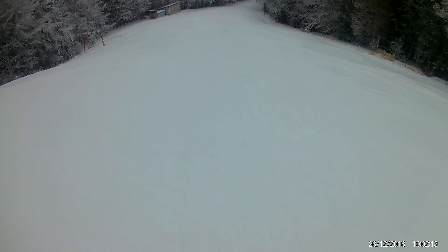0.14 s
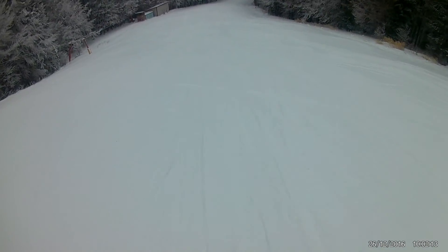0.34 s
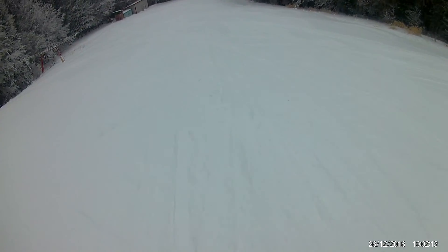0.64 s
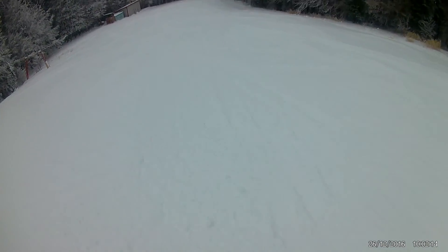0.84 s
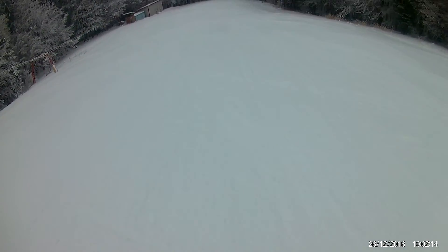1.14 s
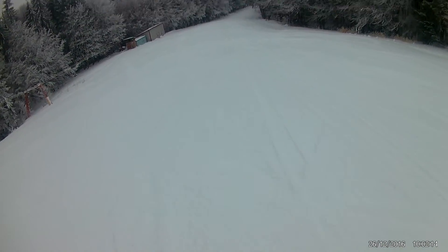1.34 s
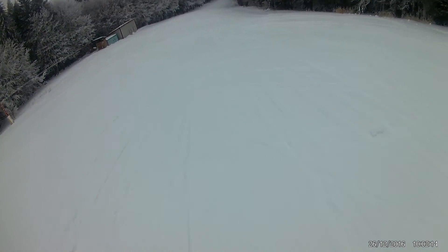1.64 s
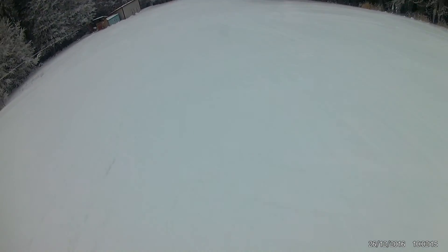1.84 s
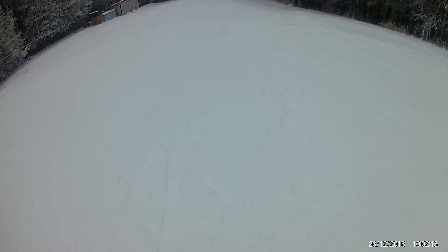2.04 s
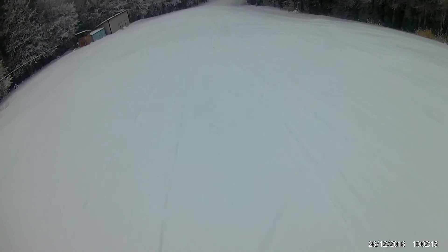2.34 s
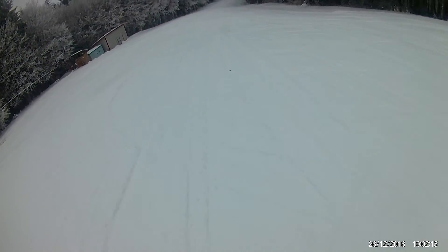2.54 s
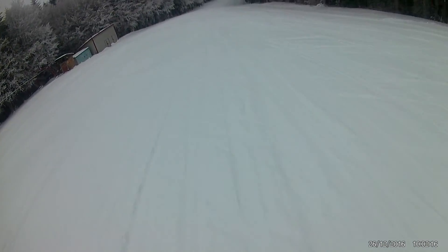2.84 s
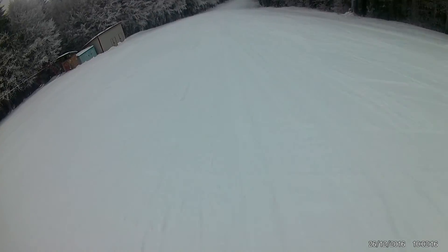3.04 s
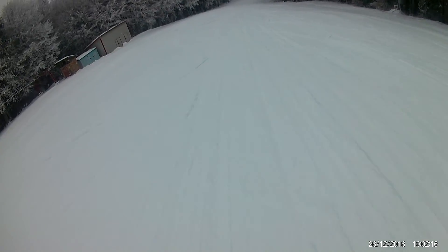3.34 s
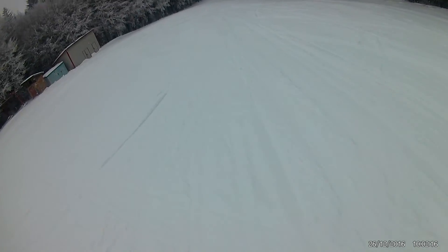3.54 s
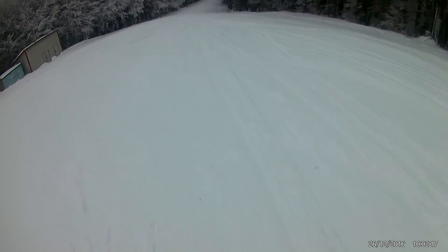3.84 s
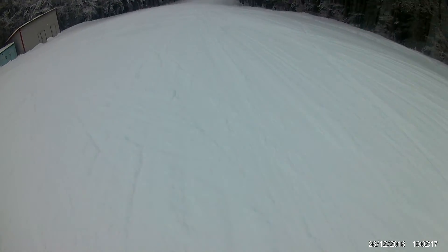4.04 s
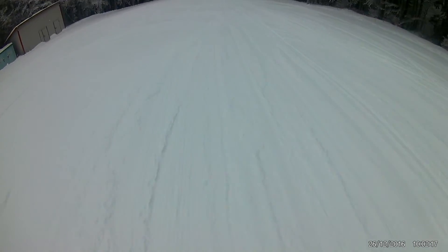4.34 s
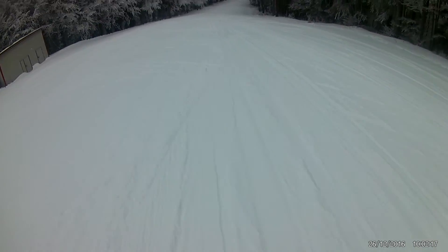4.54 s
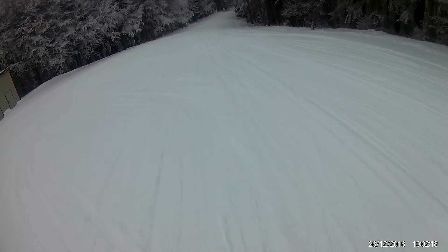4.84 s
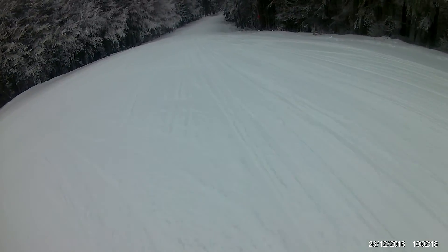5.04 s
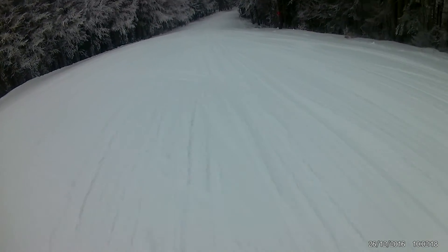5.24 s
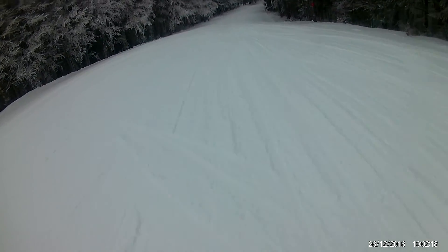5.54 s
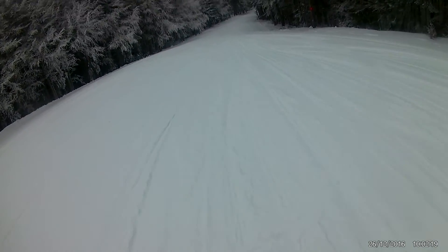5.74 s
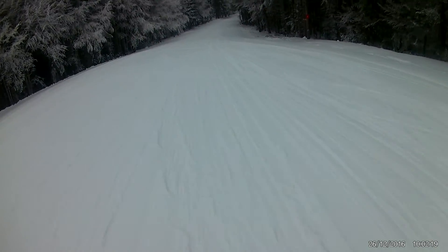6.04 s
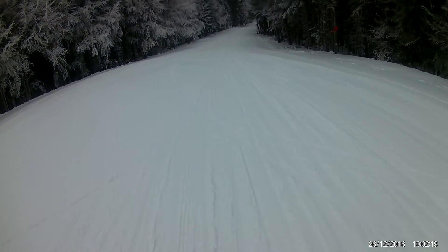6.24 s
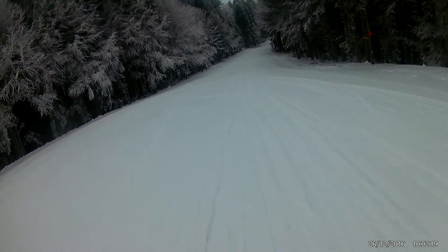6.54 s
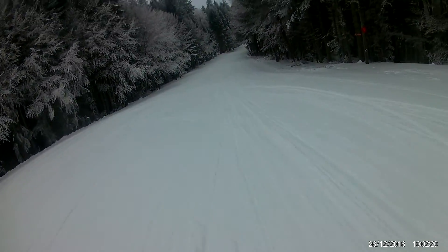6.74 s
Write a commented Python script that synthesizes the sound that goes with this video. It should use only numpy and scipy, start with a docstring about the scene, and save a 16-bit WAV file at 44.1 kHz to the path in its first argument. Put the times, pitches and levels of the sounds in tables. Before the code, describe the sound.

Skis scrape and hiss over packed snow with a low fluttering drone, while a loose plastic camera mount clacks sharply a few times.

```python
"""Packed snow scrapes and crackles under gliding skis: dense random grains of fracture, filtered to a spectrum.
A body-worn camera in a closed plastic case hears it, while its loose mount chafes: filtered stick-slip clicks.
Ski vibration drones as resonant noise whose pitch rises with load; wind rumbles as slowly modulated low noise.
Ice crumbs tick as decaying noise bursts, the mount clacks as struck resonances over bumps,
and patches of icy crust break in coarser grains."""
import sys
import numpy as np
from scipy import signal
from scipy.fft import rfft, irfft
from scipy.io import wavfile
from scipy.ndimage import uniform_filter1d, map_coordinates

SR = 44100
rng = np.random.default_rng(int(sys.argv[2]) if len(sys.argv) > 2 else 0)


def wav_out(sig):
    """Save sig, one row per channel (or a flat mono array), as 16-bit PCM at SR to the path in sys.argv[1]."""
    wavfile.write(sys.argv[1], SR, np.round(np.clip(np.atleast_2d(sig).T, -1, 1) * 32767).astype(np.int16))


N = 304290
T = np.arange(N) / SR  # time [s]


def undb(db):
    """Logarithmic level: decibels become an amplitude gain."""
    return 10 ** (np.asarray(db) / 20)


def unit(x):
    """Normalisation: scale to rms 1."""
    return x / np.sqrt(np.mean(x ** 2))


def response(points, size=8192):
    """Minimum phase: the causal impulse response, at peak 1, of a spectrum (frequency [Hz], level [dB])."""
    hz, db = np.transpose(points)
    octave = np.log2(np.maximum(np.arange(size // 2 + 1) * SR / size, 1))
    # above the last point the spectrum falls by 48 dB per octave, at most 60 dB
    rolloff_db = np.clip(48 * (octave - np.log2(hz[-1])), 0, 60)
    gain_db = np.interp(octave, np.log2(hz), db) - rolloff_db
    # folding the cepstrum onto positive time makes the response causal
    cepstrum = irfft(np.log(undb(gain_db)))
    cepstrum[1:size // 2] *= 2
    cepstrum[size // 2 + 1:] = 0
    h = irfft(np.exp(rfft(cepstrum)))[:size // 2]
    return h / np.abs(h).max()


def ring(x, h):
    """Convolution: every sample of x excites the impulse response h."""
    return signal.fftconvolve(x, h)[:N]


def colour(x, points):
    """Linear filtering: shape x by a spectrum, at rms 1."""
    return unit(ring(x, response(points)))


def walk(rate):
    """Random modulation: straight lines between random values, rate per second, with spread near 1."""
    return 1.2 * np.interp(T * rate, np.arange(4096), rng.standard_normal(4096))


def grains(rate, spread_db):
    """Shot noise: random clicks, rate per second, mostly small with a few large ones, at rms 1."""
    size = undb(spread_db * np.minimum(rng.exponential(size=N), 4.8))
    present = rng.random(N) < rate / SR
    return unit(present * size * rng.choice([-1, 1], N))


def blows(times, db):
    """Impulsive excitation: one single-sample impulse for each blow."""
    out = np.zeros(N)
    index = np.clip(np.round(times * SR).astype(int), 0, N - 1)
    np.add.at(out, index, undb(db))
    return out


def add(out, s, sound):
    """Superposition: mix a short sound into out at time s."""
    part = out[max(round(s * SR), 0):][:len(sound)]
    part += sound[:len(part)]


def along(table):
    """Linear interpolation: the columns of a curve table at every sample."""
    s, *columns = np.transpose(table)
    return [np.interp(T, s, c) for c in columns]


def swells(table):
    """Gaussian envelopes: bumps of gain, each as long as two standard deviations."""
    return sum(undb(db) * np.exp(-2 * ((T - s) / length) ** 2) for s, length, db in table)


# spectrum of the scrape under the bases: (frequency [Hz], level [dB])
SNOW_SPECTRUM = [(200, 15.5), (330, 13), (450, 9.5), (750, 7), (1050, 5.5), (1370, 15), (1900, 5.5),
                 (2400, -2.5), (2750, -7.5), (3200, -1.5), (4250, -5.5), (5100, -19), (6000, -12.5),
                 (7400, -33)]
# spectrum of fine spray, also heard in crumbs and crust: (frequency [Hz], level [dB])
SPRAY_SPECTRUM = [(3000, -20), (4300, 15.5), (6100, 10.5), (7400, 5), (7950, -14.5), (8600, 0.5),
                  (9200, -3.5), (10700, -0.5), (12000, -20), (16000, -15.5)]
SPRAY_DB, SPRAY_PER_BITE = -72, 1.4  # level at the usual bite; dB gained per dB of bite


def snow(bite_db, scrape_db=-42.0, rough_db=0.77, patchy_db=5.0):
    """Granular fracture: countless crystals break under the bases; sparser ones crumble off the edges in bursts."""
    texture = walk(45)
    scrape = colour(grains(rate=9000, spread_db=2.0), SNOW_SPECTRUM)
    scrape = scrape * undb(scrape_db + bite_db + rough_db * texture)
    crumble = np.exp(-T[:1024] / .0009)  # decay constant 0.9 ms
    bursts = ring(np.abs(grains(rate=420, spread_db=3.5)), crumble) * rng.standard_normal(N)
    spray_db = SPRAY_DB + SPRAY_PER_BITE * bite_db + patchy_db * texture
    return scrape + colour(bursts, SPRAY_SPECTRUM) * undb(spray_db)


# spectrum of the mount, also heard as its rattle: (frequency [Hz], level [dB])
MOUNT_SPECTRUM = [(900, -24), (1150, -13.5), (1380, 4.5), (1900, 6.5), (2100, -4.5), (2380, 0.5),
                  (2700, -38.5), (4100, -13.5), (4600, -16.5), (5200, -58.5)]
# short rubs of the mount: (time at the middle [s], length [s], level [dB])
MOUNT_RUBS = [(0.32, .03, -47), (0.383, .025, -43), (0.686, .012, -40.5), (0.908, 0.034, -40.5),
              (1.067, 0.012, -35.5), (1.68, 0.24, -47), (2.524, 0.029, -37), (4.229, 0.029, -40.5),
              (4.62, 0.11, -41), (4.897, 0.033, -42.5), (5.068, .023, -40.5), (5.43, 0.13, -42),
              (6.378, 0.038, -36), (6.774, 0.011, -39.5)]
# stiff, higher ring of a rubbed joint: (frequency [Hz], level [dB])
JOINT_SPECTRUM = [(1500, -25.5), (1850, -1), (2000, 1.5), (2300, -5), (2600, -29)]
# squeaky resonance of the mount: (frequency [Hz], level [dB])
SQUEAK_SPECTRUM = [(4400, -30), (4740, -14.5), (4870, -3.5), (4990, -9), (5250, -37)]
JOINT_DB, SQUEAK_DB = -9.5, -23.5  # re the level of a rub
CHAFE_DB, CHAFE_PER_BITE = -51, 0.51  # level at the usual bite; dB gained per dB of bite
CHAFE_FLICKER_DB = 2.2


def chafing(bite_db):
    """Stick-slip friction: the joint slips in tiny clicks, more as the skis bite; at times it rubs and squeaks."""
    db = CHAFE_DB + CHAFE_PER_BITE * bite_db + CHAFE_FLICKER_DB * walk(28)
    light = colour(grains(rate=650, spread_db=3.5), MOUNT_SPECTRUM) * undb(db)
    slips = grains(rate=2200, spread_db=2.4)
    joint = undb(JOINT_DB) * colour(grains(rate=1300, spread_db=4.0), JOINT_SPECTRUM)
    squeak = undb(SQUEAK_DB) * colour(slips, SQUEAK_SPECTRUM)
    return light + swells(MOUNT_RUBS) * (colour(slips, MOUNT_SPECTRUM) + joint + squeak)


# how strongly the skis shake: (time [s], level [dB])
SHAKE_CURVE = [(0, -42), (1.05, -42), (1.55, -31.5), (2.08, -38.5), (2.38, -31), (2.92, -39), (3.2, -34.5),
               (4.01, -35.5), (4.08, -50.5), (4.3, -44.5), (4.57, -34), (5.08, -32.5), (5.18, -36),
               (5.82, -30.5), (6.02, -36.5), (6.14, -48), (6.53, -30.5), (6.9, -32.5)]
# resonance of the drone before its pitch shifts: (frequency [Hz], level [dB])
DRONE_SPECTRUM = [(70, -34.5), (115, -24), (136, -10.5), (154, 1.5), (175, 5), (186, -0.5), (205, -10.5),
                  (245, -22), (400, -51.5)]
DRONE_HZ = 172  # nominal pitch of that spectrum
SHAKE_REF_DB, LOADED_HZ, RISE_HZ_PER_DB = -34, 173.54, 1.5  # pitch at the reference shake, and its rise
SURGE_DB, SURGES_PER_S = 3, 17  # uneven snow makes the shaking come and go


def drone():
    """Forced resonance: the groomed surface shakes the skis; a low mode, rising with load, carries it to the case."""
    db, = along(SHAKE_CURVE)
    hz = LOADED_HZ + RISE_HZ_PER_DB * (db - SHAKE_REF_DB)
    hum = colour(rng.standard_normal(N), DRONE_SPECTRUM)
    # reading the hum faster or slower shifts its pitch
    hum = map_coordinates(hum, [np.cumsum(hz / DRONE_HZ)], order=3, mode="mirror")
    # constant load on the skis keeps the shaking from dying away for long
    power = uniform_filter1d(uniform_filter1d(hum ** 2, size=2200), size=2200) + 1e-6
    steady = unit(hum / np.sqrt(power))
    return steady * undb(db + SURGE_DB * walk(SURGES_PER_S))


# spectrum of the rumble in the case: (frequency [Hz], level [dB])
WIND_SPECTRUM = [(10, -33), (25, 1), (42, 3), (60, 12.5), (85, 7), (120, 9), (220, -7), (500, -61.5)]
# gusts on the case: (time at the middle [s], length [s], level [dB])
WIND_GUSTS = [(1.67, 0.043, -37.5), (1.8, 0.03, -39), (4.1, 0.042, -46), (6.15, 0.27, -48)]
WIND_DB, EDDY_DB, EDDIES_PER_S = -47, 2, 7.9  # steady headwind and its flutter


def wind():
    """Turbulent pressure: eddies of air buffet the closed case with a dull rumble that swells in gusts."""
    rumble = colour(rng.standard_normal(N), WIND_SPECTRUM)
    headwind = undb(WIND_DB + EDDY_DB * walk(EDDIES_PER_S))
    return rumble * (headwind + swells(WIND_GUSTS))


# larger ice crumbs on the shell: (time [s], strike strength [dB], bright top re strike [dB])
CRUMB_TICKS = [(0.1203, -42.5, -13), (1.1357, -44, -17), (1.6164, -36, -36), (1.681, -37.5, -22),
               (2.2281, -38, -23), (2.4035, -37.5, -13), (4.62, -43, -15), (5.4926, -41, -13),
               (5.5587, -52.5, -3), (5.8933, -42, -19)]
# spectrum of the snapping shell, also heard in crust: (frequency [Hz], level [dB])
SNAP_SPECTRUM = [(1800, -21), (2700, -5), (3250, 1.5), (3850, -7), (4250, 3.5), (4800, -3), (5300, -9.5),
                 (6000, -5), (7000, -45.5)]


def crumbs(crumble_s=0.0015, shell_db=-9.0):
    """Brittle impact: bits of ice burst on the shell with a thin, bright tick."""
    s, db, top_db = np.transpose(CRUMB_TICKS)
    burst = np.exp(-T[:1024] / crumble_s)
    shell = ring(blows(s, db + shell_db), burst) * rng.standard_normal(N)
    shards = ring(blows(s, db + top_db), burst) * rng.standard_normal(N)
    return ring(shell, response(SNAP_SPECTRUM)) + ring(shards, response(SPRAY_SPECTRUM))


# clacks of the mount: (time [s], clack peak [dB], clack pitch [Hz], thud pitch [Hz],
# thud re clack [dB], drive of the snap re clack [dB])
MOUNT_KNOCKS = [(0.302, -31, 1840, 510, -7, -17), (0.816, -29.5, 1380, 1060, -12, -13),
                (0.9764, 1, 1610, 920, -27, -19.5), (0.9837, -8, 1670, 1050, -20, -20),
                (0.995, -21, 1690, 982, -19, -21), (1.06, -28, 1730, 510, -14, -22),
                (1.274, -11.5, 1535, 890, -18.5, -19.5), (1.3181, -21.5, 1500, 571, -19, -21),
                (1.4819, -28.5, 1480, 587, -15, -21), (1.617, -25, 1530, 807, -22, -16),
                (1.6473, -23, 1530, 616, -21, -21), (1.6817, -30, 1400, 650, -12, -14),
                (1.798, -24, 1460, 506, -14, -19), (2.433, -28.5, 1340, 587, -13, -20),
                (3.4064, -27.5, 1680, 611, -10, -5), (3.4342, -24, 1370, 730, -13, -17),
                (3.469, -26, 1420, 813, -18, -10), (3.4917, -23, 1580, 834, -11, -22),
                (3.5016, -15, 1560, 526, -8, -11), (3.504, -18, 1290, 800, -6.5, -18),
                (3.8667, -29.5, 1690, 506, -13, -20), (4.116, -33, 1440, 1060, -21, -15),
                (4.3032, -28.5, 1500, 946, -13, -12), (4.4447, -27, 1410, 668, -16, -26),
                (4.8936, -29, 1880, 522, -26, -13), (5.4797, -27.5, 1480, 900, -12, -20),
                (6.6093, -25, 1360, 850, -12, -14.5), (6.6503, -6, 1653, 913, -20, -15),
                (6.7003, -25.5, 1360, 765, -1, -23), (6.765, -21.5, 1570, 895, -8, -16),
                (6.794, -34, 1330, 900, 1, -17)]
# spectrum of a clack before it moves to its own pitch: (frequency [Hz], level [dB])
CLACK_SPECTRUM = [(200, -31.5), (480, -15), (700, -24.5), (1100, -34.5), (1320, -2.5), (1460, -2.5),
                  (1620, 3.5), (1790, -2.5), (2000, -19.5), (2300, -14.5), (2650, -33), (4000, -74)]
CLACK_HZ = 1600  # nominal pitch of that spectrum
# upper modes of the case: (frequency [Hz], level [dB], time to decay by 60 dB [s])
CASE_MODES = [(2286, 2.5, 0.018), (2930, -3, 0.013), (3276, -6, 0.021), (4177, -1.5, 0.017),
              (4825, -12.5, 0.028), (6000, -28, .008)]


def knocks(thud_s=0.0012, contact_s=0.00076, rattle_db=-25, rattle_s=0.0052):
    """Modal impact: the mount hits its stop with a dry hollow clack, a thud, a snap of case modes and a rattle."""
    out, t = np.zeros(N), T[:2048]
    snap = np.zeros(len(t))
    for hz, db, t60 in CASE_MODES:
        decay = np.exp(-np.log(1000) * t / t60)
        snap += undb(db) * np.sin(2 * np.pi * hz * t) * decay
    snap = snap * (1 - np.exp(-t / contact_s))  # the contact force takes a moment to build
    swing = (t / thud_s / 2) ** 2 * np.exp(2 - t / thud_s)  # the heavier body starts slower still
    for s, db, clack_hz, thud_hz, thud_db, snap_db in MOUNT_KNOCKS:
        # each point of contact gives the shell a slightly different pitch
        clack = response(np.array(CLACK_SPECTRUM) * [clack_hz / CLACK_HZ, 1])
        thud = swing * np.sin(2 * np.pi * thud_hz * t)
        add(out, s, undb(db) * clack)
        add(out, s, undb(db + thud_db) * thud)
        add(out, s, undb(db + snap_db) * snap)
    s, db = np.transpose(MOUNT_KNOCKS)[:2]
    settling = ring(blows(s, db), np.exp(-t / rattle_s)) * rng.standard_normal(N)
    shell = response(MOUNT_SPECTRUM)
    rattle = ring(settling, shell / np.linalg.norm(shell))
    return out + undb(rattle_db) * rattle


# patches of icy crust: (time at the middle [s], length [s], level [dB])
CRUST_PATCHES = [(1.658, 0.061, -58.5), (1.803, 0.083, -59), (3.46, 0.072, -52.5), (5.514, 0.055, -60)]


def crust(spray_db=-17):
    """Brittle fracture: icy patches break in coarser, harder grains and throw up more spray."""
    coarse = colour(grains(rate=1300, spread_db=4.0), SNAP_SPECTRUM)
    fine = colour(grains(rate=1500, spread_db=4.0), SPRAY_SPECTRUM)
    return swells(CRUST_PATCHES) * (coarse + undb(spray_db) * fine)


# how hard the skis bite the snow: (time [s], level [dB]), used relative to the usual bite
BITE_CURVE = [(0, -59.5), (.82, -60), (1.38, -56), (2.05, -57.5), (2.45, -56), (2.95, -58), (3.47, -55.5),
              (4.05, -60.5), (4.3, -57), (5.05, -56.5), (5.48, -56.5), (5.7, -58), (6.3, -57), (6.9, -56.5)]
BITE_REF_DB = -57.5  # the usual bite


def scene():
    """Superposition: everything reaches one microphone through the case; the open slope gives no echo."""
    bite_db = along(BITE_CURVE)[0] - BITE_REF_DB
    skis = snow(bite_db) + drone() + crust()
    mount = chafing(bite_db) + knocks()
    return (skis + mount + wind() + crumbs())[None]


HISS_DB = -77.5  # rms before the top is cut
TOP_HZ = 15800


def record(dry):
    """Saturation and band limiting: the camera adds faint hiss, flattens the loudest peaks and cuts the top."""
    x = dry + undb(HISS_DB) * rng.standard_normal(dry.shape)
    x = x / (1 + (x / .94) ** 10) ** (1 / 10)  # bends smoothly towards a ceiling of 0.94
    low_pass = signal.ellip(10, .2, 80, TOP_HZ, fs=SR, output="sos")
    return signal.sosfilt(low_pass, x)


dry = scene()
out = record(dry)
wav_out(out)
```